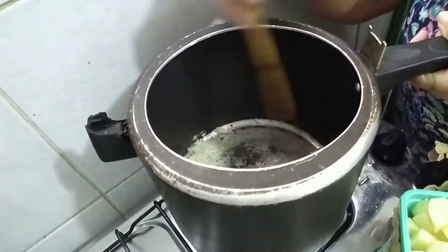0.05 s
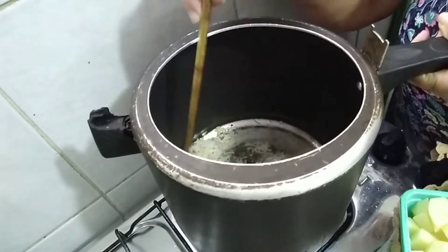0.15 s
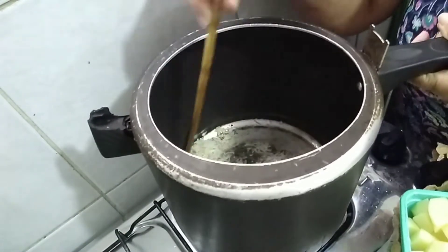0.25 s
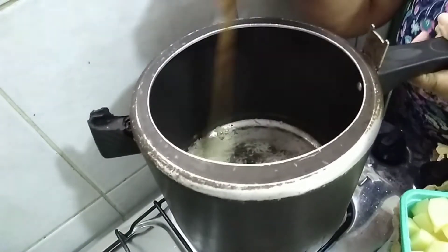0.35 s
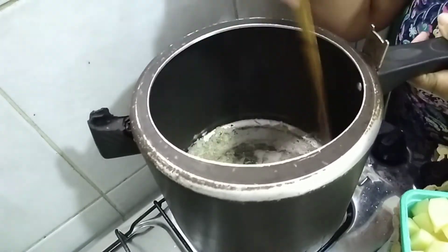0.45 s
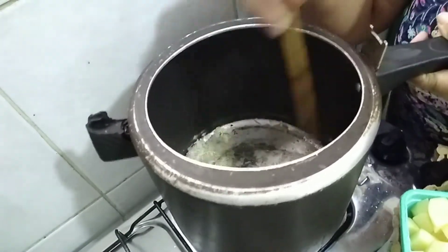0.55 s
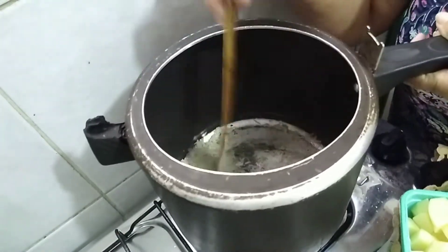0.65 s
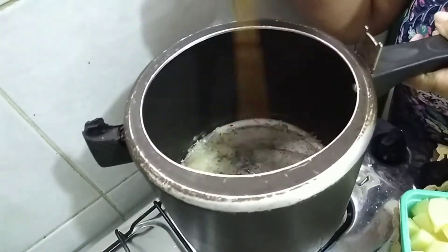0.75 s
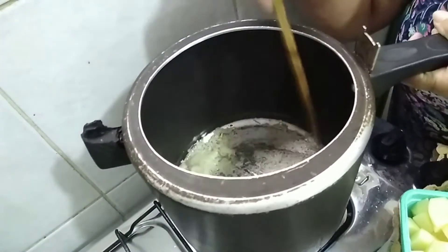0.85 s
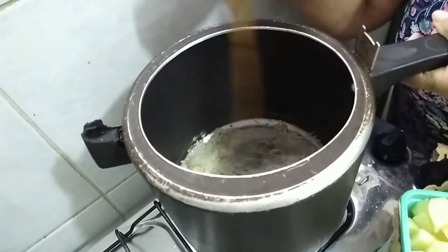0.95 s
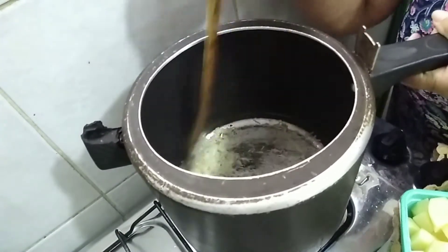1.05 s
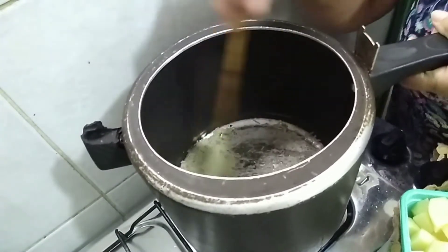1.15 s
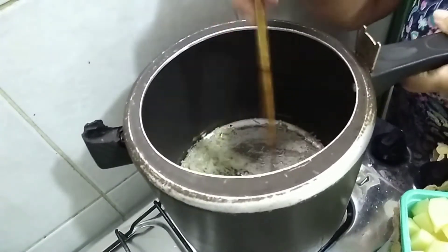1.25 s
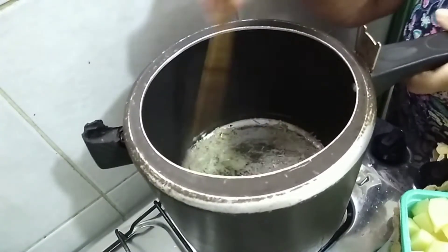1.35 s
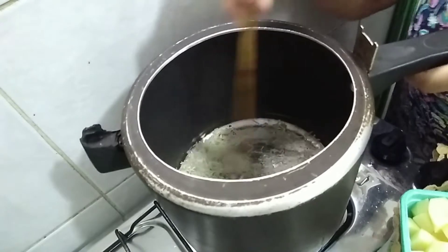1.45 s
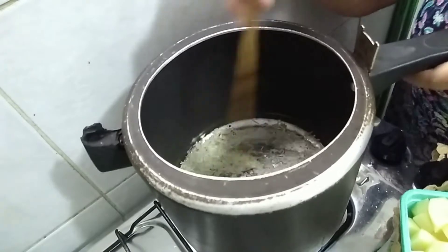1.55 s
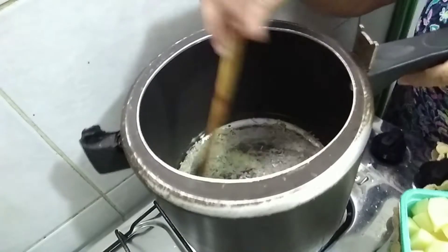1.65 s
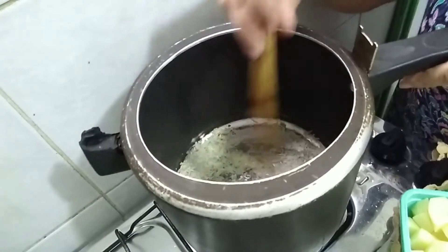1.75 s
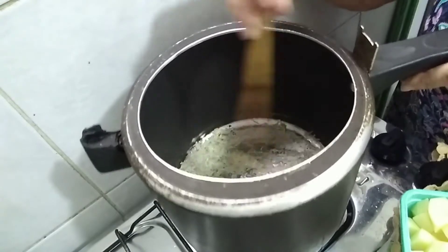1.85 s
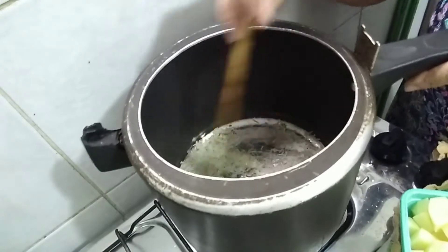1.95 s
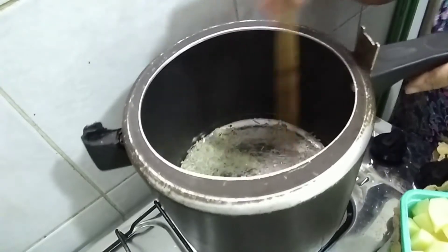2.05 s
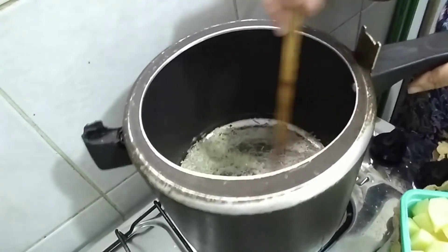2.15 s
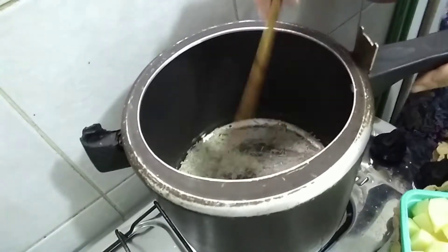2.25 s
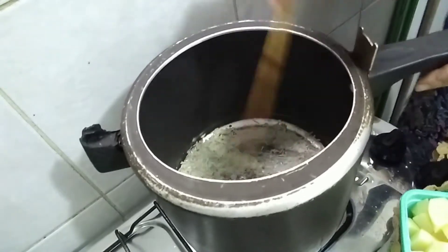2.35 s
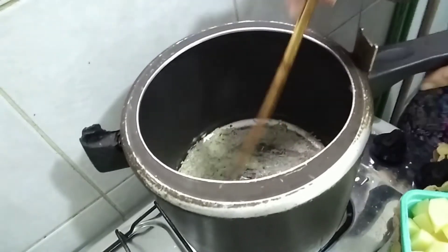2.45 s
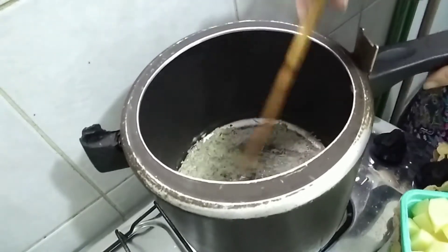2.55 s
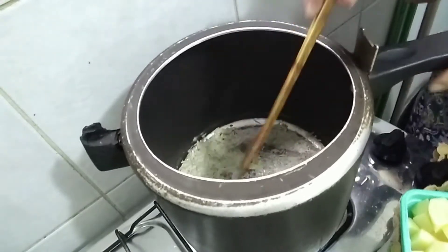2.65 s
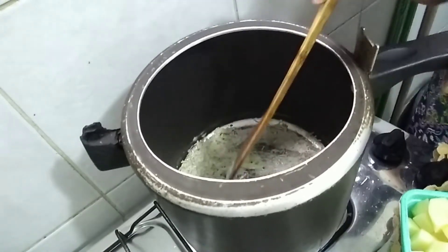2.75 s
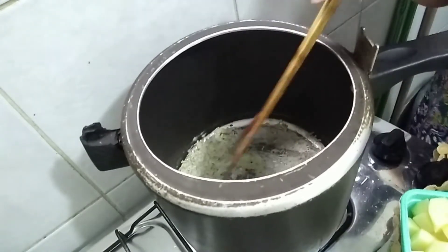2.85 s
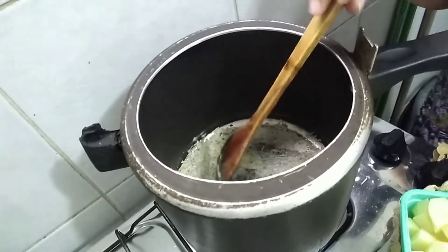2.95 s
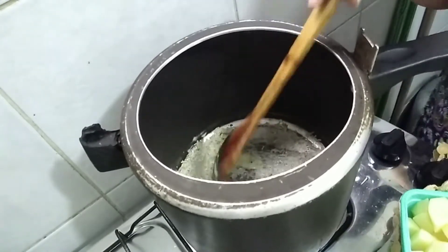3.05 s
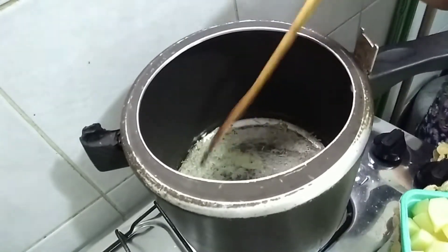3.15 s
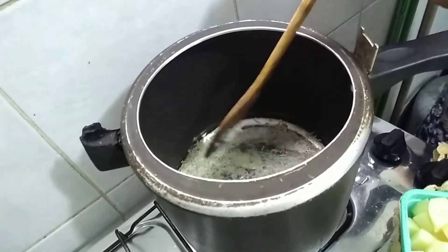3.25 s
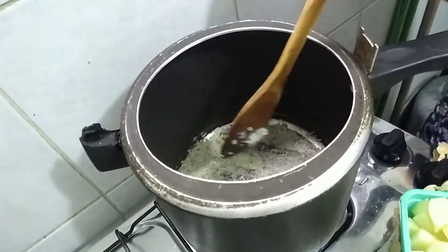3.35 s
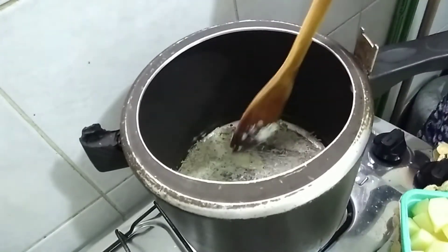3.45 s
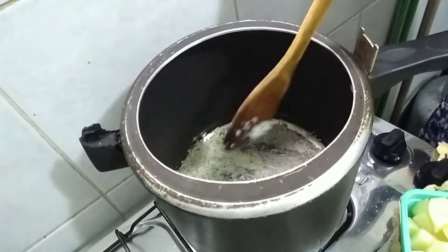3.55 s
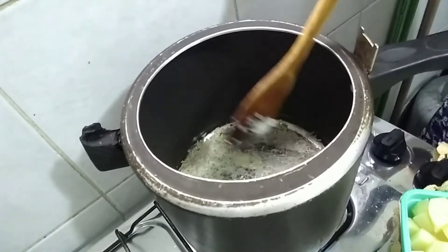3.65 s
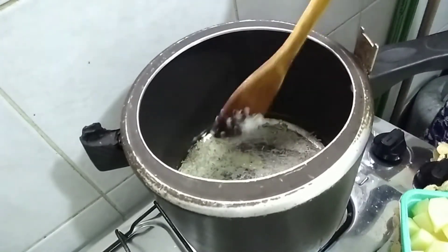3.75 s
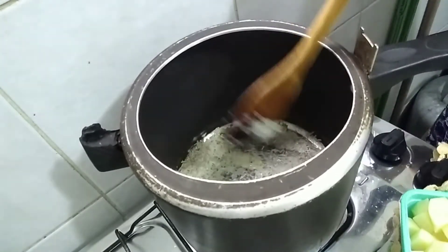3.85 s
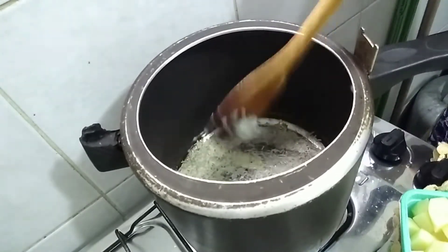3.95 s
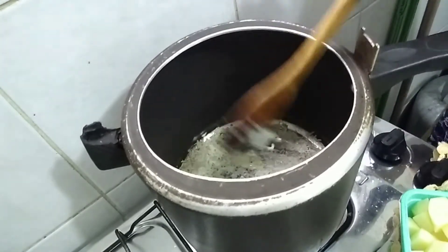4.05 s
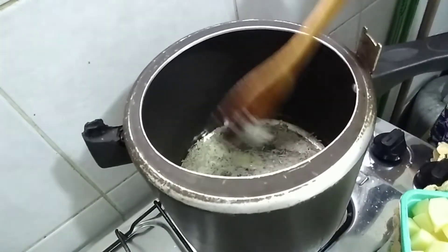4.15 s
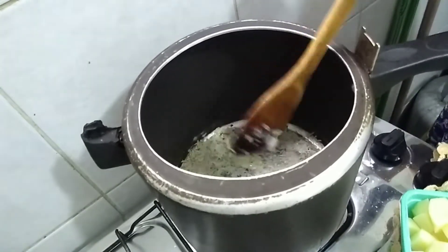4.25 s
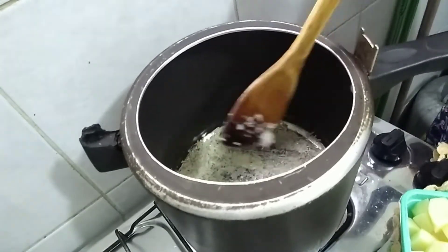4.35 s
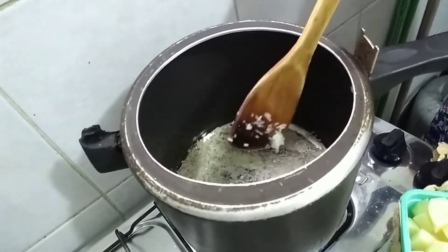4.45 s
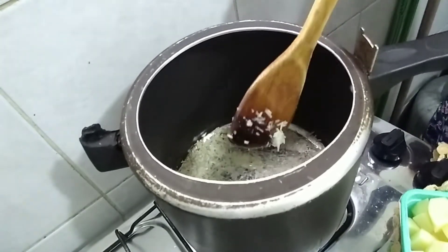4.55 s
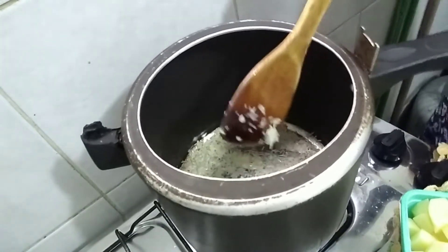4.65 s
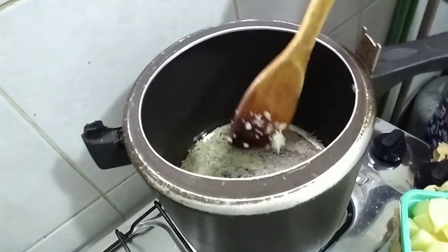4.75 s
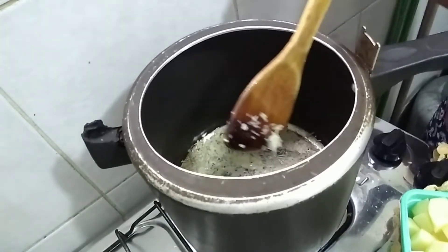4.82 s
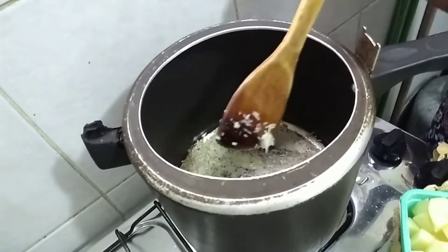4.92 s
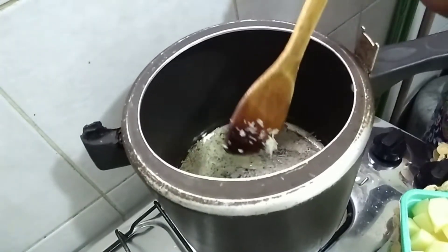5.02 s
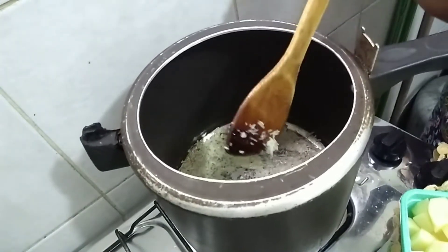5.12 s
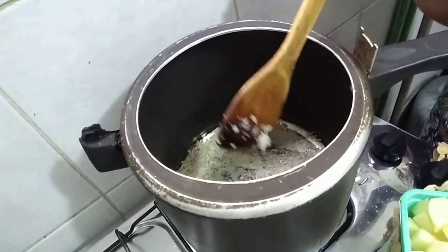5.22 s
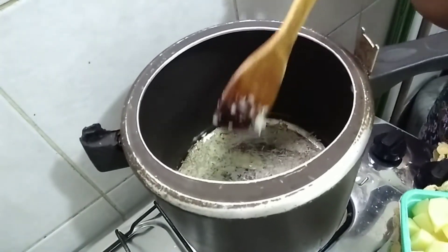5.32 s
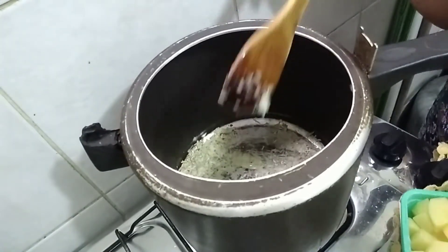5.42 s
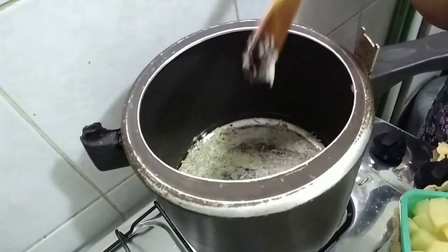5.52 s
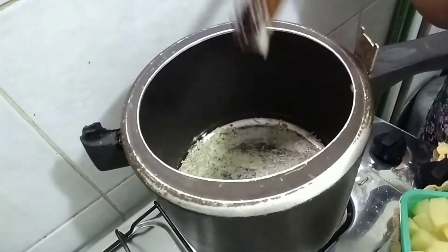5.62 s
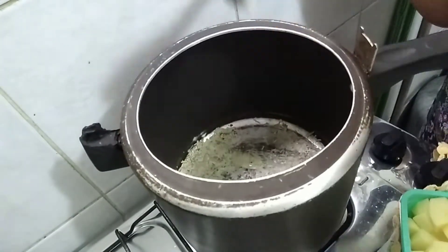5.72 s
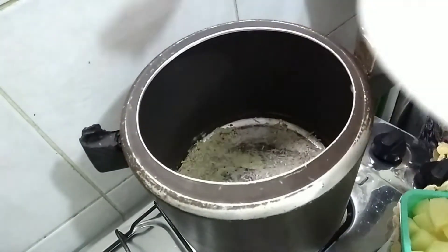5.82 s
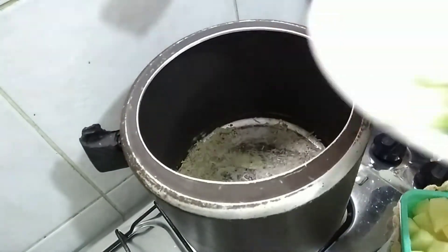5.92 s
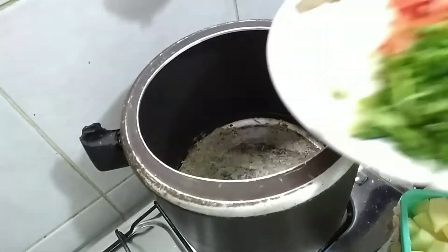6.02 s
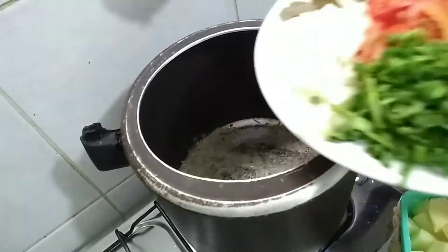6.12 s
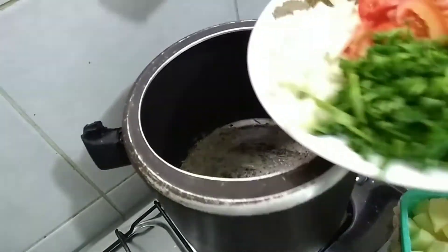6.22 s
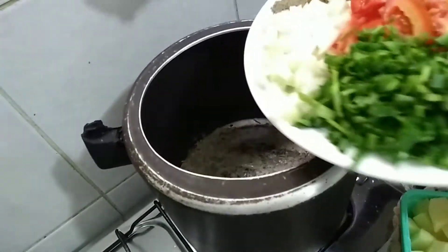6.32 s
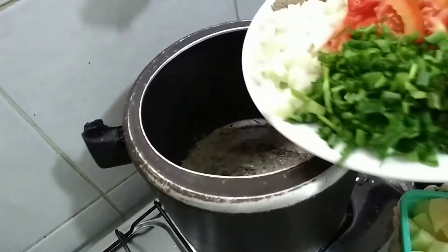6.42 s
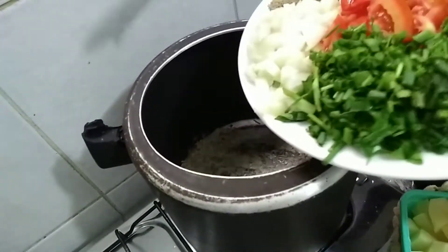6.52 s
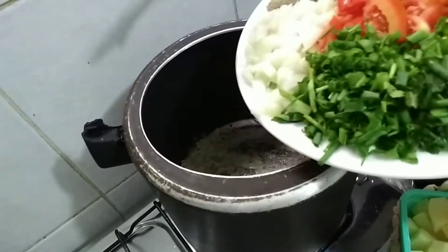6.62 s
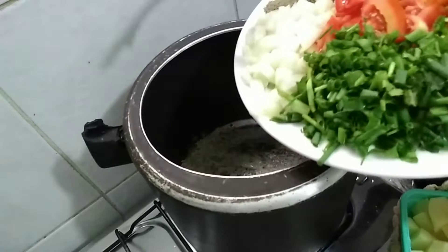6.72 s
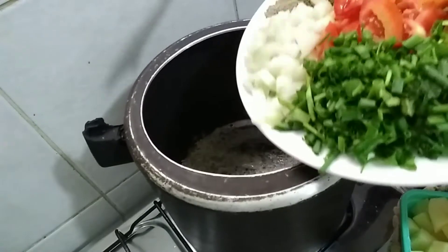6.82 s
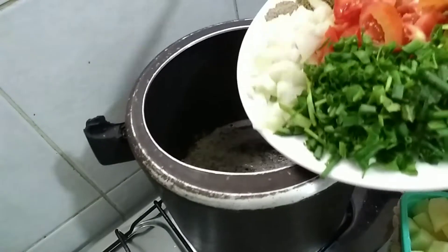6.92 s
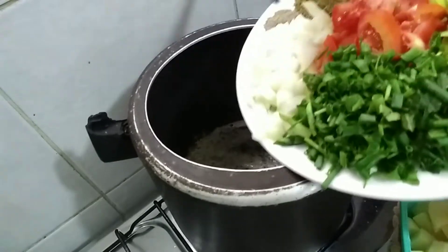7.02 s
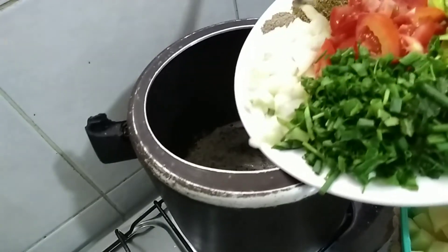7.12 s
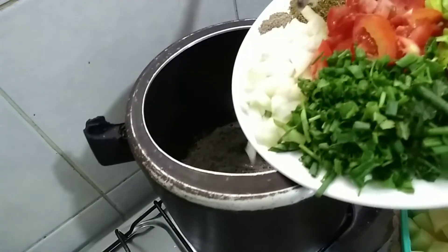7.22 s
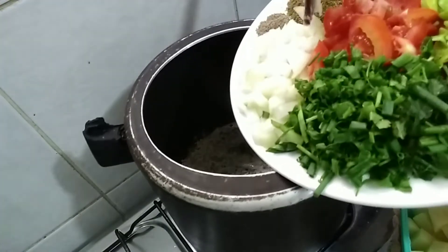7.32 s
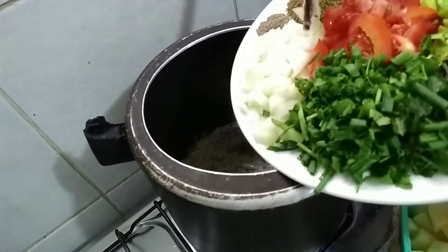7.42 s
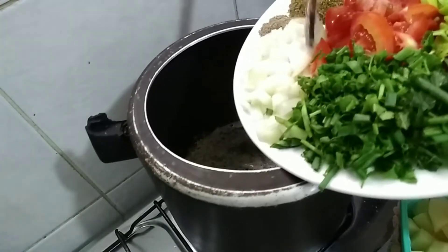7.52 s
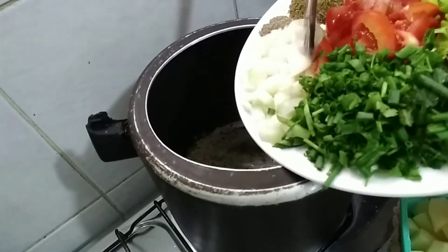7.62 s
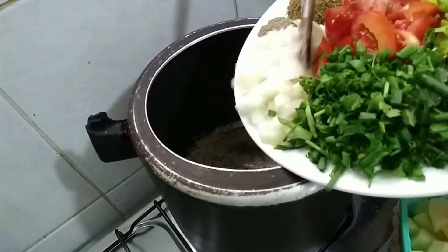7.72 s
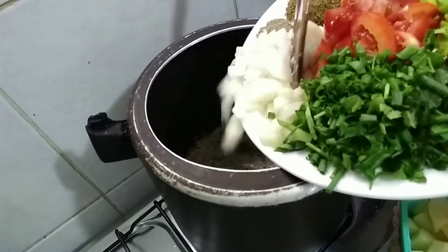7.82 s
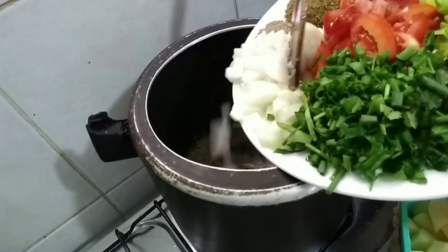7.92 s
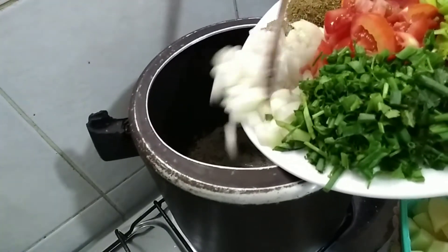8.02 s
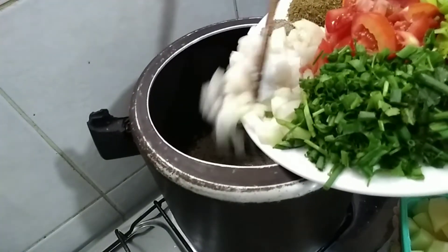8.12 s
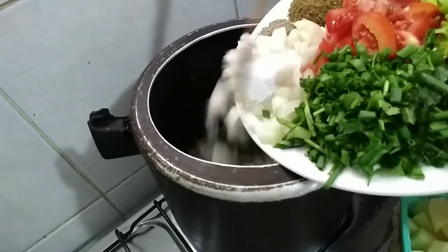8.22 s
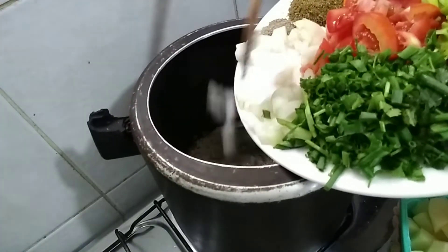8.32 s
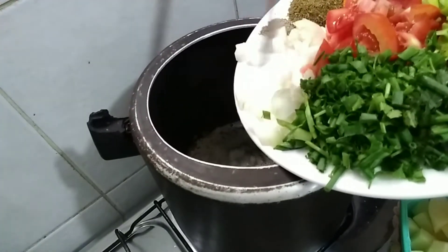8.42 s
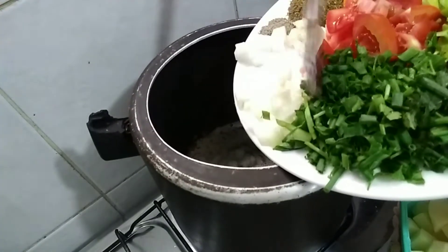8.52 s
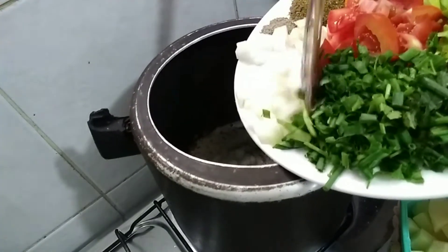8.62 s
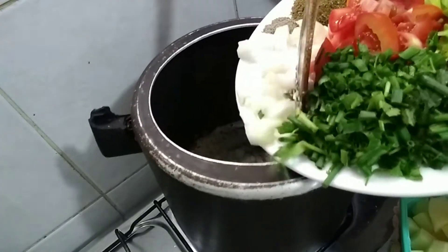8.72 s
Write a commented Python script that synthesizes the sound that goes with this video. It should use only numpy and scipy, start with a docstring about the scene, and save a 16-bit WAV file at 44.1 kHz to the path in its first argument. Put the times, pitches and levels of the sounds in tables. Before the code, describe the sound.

Bright frying hiss slowly fades under hollow spoon knocks, then flares as chopped onion lands with soft thuds; a gas flame and motors hum below.

```python
"""Garlic sizzles in a film of oil in a deep metal pot: a dense random patter of bubbles, shaped as coloured noise.
Chopped onion falls in with soft thuds and the frying flares up. A wooden spoon stirs and knocks, a plate bumps
the rim and shades the hiss, and the pot rocks on its grate: short clicks excite resonances, and struck parts ring.
Behind them are a gas flame (noise) and humming motors (sine tones) in a small tiled kitchen.
Two close microphones with stereo widening pick it up; the levels below are set ahead of balance and widening."""
import sys
import numpy as np
from scipy import signal
from scipy.fft import rfft, irfft, next_fast_len
from scipy.io import wavfile

SR = 44100
rng = np.random.default_rng(int(sys.argv[2]) if len(sys.argv) > 2 else 0)


def transcribe(signal):
    """Save signal, clipped to [-1, 1], as a 16-bit WAV file at the path in sys.argv[1]."""
    frames = np.atleast_2d(signal).T
    limited = np.clip(frames, -1, 1)
    pcm = np.round(limited * 32767).astype(np.int16)
    wavfile.write(sys.argv[1], SR, pcm)


N = 386757

# spectrum of the frying: (f/Hz, level/dB per Hz)
SIZZLE_SPECTRUM = [(300, -40), (800, -12), (1500, -49), (2400, 3.5), (3000, -1), (3650, 0.5), (4300, 1.5),
                   (5300, 1.25), (6400, 1.5), (7500, 2), (8600, 2), (10500, 3), (12500, 3), (14300, -4)]
# resonances of the pot's air under steady excitation: (f/Hz, width/Hz, level/dB)
POT_AIR = [(1168, 38, -1), (1323, 170, -6.5), (1710, 160, -3), (2387, 206, -9), (2735, 120, -7.5),
           (3100, 1000, -14.5), (5460, 320, -14)]
# low resonances of the pot on its grate: (f/Hz, width/Hz, level/dB)
GRATE_THUD = [(123, 134, -8), (189, 29, 1.5), (250, 29, -4), (323, 49, 0)]
# chopped onion landing in the oil: (t/s, thud level/dB, ring level of the pot's air/dB)
ONION_LANDINGS = [(7.192, -67, -52), (7.964, -54, -42.5), (7.983, -41, -43.5), (8.114, -60, -51),
                  (8.164, -46, -36), (8.223, -49, -43), (8.236, -54, -44.5), (8.261, -51, -44),
                  (8.31, -50, -42.5), (8.319, -54, -37.5), (8.397, -62, -51), (8.453, -65, -54)]
# the steady sounds dip briefly: (start t/s, end t/s, hiss level/dB, bass level/dB)
DIPS = [(1.2, 1.544, -2.5, -4.5), (6.128, 6.307, -4.5, -2.5), (7.627, 7.966, -3.5, -3.5)]
DIP_EDGE_S = 0.04
FRYING_DB = -38.5   # frying level at the start
BLOW = SR // 2   # samples that a blow lasts
GRATE_LAG_S = 0.00453   # the grate answers after the contact
PLATE_LAG_S = 0.00011   # the plate is heard this much later on the right than on the left


def sizzle(split_hz=7000, top_split_hz=10800):
    """Larger bubbles crackle, tiny ones fizz above, with fine spray on top; a hollow note sounds in the pot's air."""
    large = bursts(per_s=1800, spread_db=3.1, wash_db=3)
    tiny = bursts(per_s=1600, spread_db=3.5, wash_db=5.5)
    finest = bursts(per_s=1800, spread_db=3.4, wash_db=6)
    crackle = signal.lfilter(*signal.butter(2, split_hz, "low", fs=SR), large)
    fizz = signal.lfilter(*signal.butter(2, split_hz, "high", fs=SR), tiny)
    fizz = signal.sosfilt(signal.butter(4, top_split_hz, "low", fs=SR, output="sos"), fizz)
    spray = signal.sosfilt(signal.butter(4, top_split_hz, "high", fs=SR, output="sos"), finest)
    # the spray flickers separately from the rest
    hiss = colour((crackle + fizz) * flicker() + spray * flicker(), SIZZLE_SPECTRUM)

    bubbling = bursts(per_s=830, spread_db=-1.0, wash_db=0.5)
    hollow = rms_one(resonate(bubbling, POT_AIR)) * from_db(2.64 * drift(16))
    vigour = frying_gain()
    # the hollow note follows only part of the frying's swing in dB
    hollow_start_db, hollow_follows = -51, 0.35
    hollow_gain = from_db(hollow_start_db) * (vigour / from_db(FRYING_DB)) ** hollow_follows
    return vigour * hiss + hollow_gain * hollow


def frying_gain():
    """The hiss fades as garlic dries, flares under spoon strokes, is shaded by the plate and fed by the onion."""
    # strokes turn wet garlic onto hot metal: (start t/s, end t/s, flare level/dB)
    strokes = [(0.05, 1.1, 3), (0.51, 0.738, 2.5), (1.595, 1.834, 5), (2.08, 3.437, 1.5), (3.702, 4.01, 1),
               (4.35, 4.834, 1.6)]
    drying_db_per_s = 1.0
    attack_s, release_s = 0.19, 0.053
    plate_over_s, plate_move_s, plate_shade_db = 5.6, 0.11, -1.5
    onion_fry_db, onion_rise_s, onion_settle_s = -5.5, 0.0082, 0.61

    t = np.arange(N) / SR
    flares = sum(db * held(start, end, attack_s, release_s) for start, end, db in strokes)
    shade = plate_shade_db * np.clip((t - plate_over_s) / plate_move_s, 0, 1)
    power = from_db(FRYING_DB - drying_db_per_s * t + flares + shade) ** 2
    # a clump with a louder thud is bigger and fries up more, then settles
    for s, size_db, _ in ONION_LANDINGS:
        age = np.maximum(t - s, 0)
        swell = (1 - np.exp(-age / onion_rise_s)) * np.exp(-age / onion_settle_s)
        power = power + from_db(size_db + onion_fry_db) ** 2 * swell
    dips = sum(db * held(start, end, DIP_EDGE_S, DIP_EDGE_S) for start, end, db, _ in DIPS)
    return np.sqrt(power) * from_db(dips)


def flicker():
    """Gain that flickers as patches of wet garlic flare up and die down."""
    return from_db(.6 * drift(14) + .55 * drift(40))


def bursts(per_s, spread_db, wash_db):
    """Noise swells at random moments by random amounts and dies away at once, over a steady wash of noise."""
    decay_s = 0.0031
    happens = rng.random(N) < per_s / SR
    sizes = from_db(spread_db * np.minimum(rng.exponential(1, N), 7)) * happens
    splash_power = signal.lfilter([1], [1, -np.exp(-1 / (decay_s * SR))], sizes ** 2)
    power = splash_power / splash_power.mean() + from_db(wash_db) ** 2
    return rms_one(np.sqrt(power) * diffuse(N))


def crackles():
    """Bigger bubbles pop clear of the hiss: very short noise bursts at random moments and of random size."""
    pops_per_s, decay_s, spread_db = 140, 0.0007, 2.5
    below_hiss_db = -14
    happens = rng.random(N) < pops_per_s / SR
    pops = from_db(spread_db * np.minimum(rng.exponential(1, N), 3)) * happens
    splash = signal.lfilter([1], [1, -np.exp(-1 / (decay_s * SR))], pops)
    return frying_gain() * from_db(below_hiss_db) * colour(splash * diffuse(N), SIZZLE_SPECTRUM)


def spits():
    """Single drops of water burst out of the oil, each a pitched click."""
    # lone spits: (t/s, level/dB, f/Hz)
    drops = [(3.49, -52, 7500), (7.548, -52.5, 5200), (7.635, -54, 9000)]
    out = np.zeros((2, N))
    for s, db, hz in drops:
        add(out, s, click(db, hz))
    return out


def onion():
    """Soft clumps land with a dull thud and a hollow note each, with loose bits trickling between them."""
    # loose bits: (start t/s, end t/s, level/dB)
    trickle = (8.16, 8.37, -52)
    # the pot's air under the plate: (f/Hz, width/Hz, level/dB)
    plop = [(1190, 75, 4), (1300, 130, -3), (1660, 60, -2)]
    # the pot floor under a soft clump: (f/Hz, width/Hz, level/dB)
    soft_landing = [(190, 96, 0), (310, 57, 9), (570, 280, -6)]

    start, end, db = trickle
    edge_s = 0.021
    loose_bits = rms_one(resonate(bursts(per_s=96, spread_db=1.5, wash_db=-9), plop))
    out = from_db(db) * held(start, end, edge_s, edge_s) * loose_bits
    for s, thud_db, ring_db in ONION_LANDINGS:
        patter = contact(echo_db=2.0, echo_t60=0.12, room_db=3.0, room_t60=0.45)
        thud = at_level(resonate(patter, soft_landing), thud_db)
        hollow = at_level(resonate(clump(), plop), ring_db)
        add(out, s, thud + hollow)
    return out


def clump(count=4):
    """Several pieces land one just after another, each weaker than the last."""
    gap_s, loss_db = 0.003, 1.5   # from piece to piece; each gap also varies at random
    out = np.zeros((2, BLOW))
    for k, late in enumerate(rng.random(count)):
        start = round(gap_s * (k + late / 2) * SR) if k else 0
        piece = contact(echo_db=-7, echo_t60=.05, room_db=-10, room_t60=.3)
        out[:, start:] += from_db(-loss_db * k) * piece[:, :BLOW - start]
    return out


def wall_strikes():
    """The spoon strikes the pot wall: a blow, then the wall rings in its own modes."""
    # (t/s, level/dB, hardness/dB, ring level/dB, ring tilt/dB per octave)
    strikes = [(0.381, -42.5, -6.5, -42, -1.5), (0.405, -44.5, 1, -38, 0), (0.4215, -37.5, 5.5, -31, 1),
               (0.943, -40.5, -3, -42.5, -8), (0.970, -57, -7, -41, -9)]
    # modes of the wall: (f/Hz, level/dB, t60/s)
    wall_modes = [(667, 1, 0.22), (1174, 1, 0.14), (1697, 2, 0.15), (2890, -8, 0.12), (3110, 0, 0.2),
                  (3358, -3, 0.2), (3484, -11, 0.1), (3613, -1, 0.13), (4712, -8, 0.07), (5125, -3, 0.14)]
    # share of the force: (thud/dB, base/dB, hollow/dB, crack/dB, push/dB, tick/dB)
    shares = (-10.5, -18, -2, -3.5, -2.5, -6)
    out = np.zeros((2, N))
    for s, db, hardness_db, ring_db, tilt_db in strikes:
        out += blow(s, db, hardness_db, shares, push_hz=940)
        out += ringing(s, ring_db, wall_modes, tilt_db)
    return aside(out, lag_s=-0.00025)


def floor_taps():
    """The spoon taps the pot floor and the air across the pot sings on; a flat landing favours floor over air."""
    # (t/s, level/dB, hardness/dB, flatness/dB, contact pitch f/Hz)
    taps = [(2.373, -34, -1, 2, 1150), (2.570, -36, -2.5, -9.5, 1190), (2.641, -45, -4.5, 7.5, 600),
            (4.003, -30.5, -0.5, 4, 1070), (4.532, -29, 2.5, 12.5, 560), (4.634, -52, 2, 11, 950),
            (8.657, -44.5, -3.5, 10, 600)]
    # modes of the air across the pot: (f/Hz, level/dB, t60/s)
    air_modes = [(1040, -24, 0.091), (1176, 0, 0.081), (1340, -15, 0.06), (1598, -11, 0.06),
                 (1610, -9, 0.1)]
    # share of the force: (thud/dB, base/dB, hollow/dB, crack/dB, push/dB, tick/dB)
    shares = (-4, -9, -1.5, -15.5, -5.5, -21)
    air_ring_db = 4.5   # relative to the tap less its flatness
    out = np.zeros((2, N))
    for s, db, hardness_db, flat_db, push_hz in taps:
        out += blow(s, db, hardness_db, shares, push_hz, flat_db)
        out += ringing(s, db - flat_db + air_ring_db, air_modes)
    return aside(out, lag_s=-0.000043)


def plate_bumps():
    """The plate bumps the rim: a blow, a crisp snap, a dry clack and the ring of the rim."""
    # (t/s, level/dB, hardness/dB, ring level/dB, snap level/dB, clack level/dB)
    bumps = [(6.1082, -29.5, -0.5, -34, -46, -28), (6.3435, -39.5, -2, -38, -66, -46),
             (7.027, -40.5, -6, -50, -43, -56)]
    # modes of the rim with the plate against it: (f/Hz, level/dB, t60/s)
    rim_modes = [(1165, -10.5, 0.2), (1570, 0, 0.08), (1698, 2, 0.21), (2400, 8, 0.1), (2560, 0, 0.11),
                 (2730, -2, 0.2), (2800, -3, 0.15), (2918, -6, 0.12), (3300, -4, 0.17), (3965, -9, 0.2)]
    # share of the force: (thud/dB, base/dB, hollow/dB, crack/dB, push/dB, tick/dB)
    shares = (-5.5, -0.5, -25, 0.5, -4, -3)
    out = np.zeros((2, N))
    for s, db, hardness_db, ring_db, snap_db, clack_db in bumps:
        out += blow(s, db, hardness_db, shares, push_hz=495)
        out += ringing(s, ring_db, rim_modes)
        add(out, s, snap(snap_db) + clack(clack_db))
    return aside(out, PLATE_LAG_S)


def snap(db, hz=7400):
    """The crisp top of a glazed china contact, half an octave wide and scattered by the pot."""
    band = signal.butter(2, [hz / 2 ** .25, hz * 2 ** .25], "band", fs=SR, output="sos")
    splash = contact(echo_db=4, echo_t60=.12, room_db=-8, room_t60=.2)
    return at_level(signal.sosfilt(band, splash), db)


def clack(db):
    """China edge on metal rim, close to the microphones: a few dry cycles that swell and stop."""
    touch = contact(echo_db=-11, echo_t60=.1, room_db=-18, room_t60=.2)
    band = [(2600, 1000, 0)]   # (f/Hz, width/Hz, level/dB)
    return at_level(resonate(resonate(touch, band), band), db)


def clinks():
    """A metal utensil touches the plate: a small pitched tap and the ring of the china."""
    # (t/s, click level/dB, click pitch f/Hz, ring level/dB)
    touches = [(7.001, -43, 2530, -62), (7.0284, -43, 3480, -35), (7.0331, -45, 2650, -47),
               (7.194, -44.5, 1470, -49), (7.99, -45, 1650, -55)]
    # modes of the plate: (f/Hz, level/dB, t60/s)
    plate_modes = [(1684, -3, 0.22), (2660, -1, 0.2), (3000, -4, 0.2), (3530, 0, 0.13), (3950, 4, 0.14),
                   (4500, -6, 0.1), (5490, 1, 0.17), (7150, -4, 0.072)]
    width_hz = 370
    out = np.zeros((2, N))
    for s, db, hz, ring_db in touches:
        touch = contact(echo_db=-5, echo_t60=.06, room_db=-10, room_t60=.25)
        add(out, s, at_level(resonate(touch, [(hz, width_hz, 0)]), db))
        out += ringing(s, ring_db, plate_modes)
    return aside(out, PLATE_LAG_S)


def rubs():
    """The spoon rubs across the gritty floor: wood sticks and slips and sounds the air in the pot."""
    # (start t/s, end t/s, level/dB)
    rub_times = [(0.05, 0.108, -47), (0.52, 0.665, -46), (1.945, 2.007, -46), (3.862, 3.978, -51.5),
                 (4.377, 4.515, -49)]
    edge_s = 0.021
    strokes = sum(from_db(db) * held(start, end, edge_s, edge_s) for start, end, db in rub_times)
    return strokes * rms_one(resonate(bursts(per_s=180, spread_db=5.0, wash_db=0), POT_AIR))


def skids():
    """The spoon's edge chatters briefly along the metal."""
    # (start t/s, end t/s, level/dB)
    skid_times = [(0.38, 0.429, -36), (0.85, 0.88, -46), (3.998, 4.037, -38.5)]
    # what a skid excites: (f/Hz, width/Hz, level/dB)
    rasp = [(810, 120, -1), (1690, 90, 11.5), (3200, 300, -3), (3620, 110, 2.5), (5460, 400, -2)]
    edge_s = 0.006
    strokes = sum(from_db(db) * held(start, end, edge_s, edge_s) for start, end, db in skid_times)
    return strokes * rms_one(resonate(bursts(per_s=400, spread_db=2, wash_db=-6), rasp))


def rocks():
    """The pot rocks on its grate: a blow, then a low boom a moment later."""
    # (t/s, level/dB, hardness/dB, boom level/dB, boom pitch f/Hz)
    rock_hits = [(0.867, -43.5, -3, -39, 213), (0.914, -47, -2, -44, 159), (0.945, -40.5, -1, -39, 182),
                 (1.351, -42, 0.5, -34, 191), (1.87, -57.5, -9, -46, 203), (2.168, -40.5, 0.5, -38, 185),
                 (2.449, -40.5, -3.5, -36, 215), (2.463, -49, -3, -37, 181), (2.5, -51, -3, -43, 178),
                 (4.533, -49, -5, -24, 194), (4.813, -45, 2, -56, 200), (4.86, -46, -2, -39, 187),
                 (6.378, -43.5, -1.5, -50, 205), (6.414, -44, -4.5, -50, 195), (6.46, -52, -5, -39, 194),
                 (7.035, -52, -7.5, -37, 196), (7.056, -51, -6, -42, 185)]
    # share of the force: (thud/dB, base/dB, hollow/dB, crack/dB, push/dB, tick/dB)
    shares = (-2, -9, -7.5, -12, -14, -28)
    boom_t60_s = 0.25
    out = np.zeros((2, N))
    for s, db, hardness_db, boom_db, boom_hz in rock_hits:
        out += blow(s, db, hardness_db, shares, push_hz=690)
        out += ringing(s + GRATE_LAG_S, boom_db, [(boom_hz, 0, boom_t60_s)])
    return aside(out, lag_s=-0.0003)


def drags():
    """Pushed by spoon or plate, the pot judders along its grate with a low rumble."""
    # (start t/s, end t/s, level/dB)
    drag_times = [(0.865, 0.97, -45), (2.38, 2.66, -51), (4.57, 4.924, -53), (6.37, 6.47, -47)]
    edge_s = 0.016
    pushes = sum(from_db(db) * held(start, end, edge_s, edge_s) for start, end, db in drag_times)
    rumble = resonate(bursts(per_s=81, spread_db=2.5, wash_db=-1), GRATE_THUD)
    # the pot is too small to sound the deep bass
    no_deep_bass = signal.butter(2, 110, "high", fs=SR, output="sos")
    return pushes * rms_one(signal.sosfilt(no_deep_bass, rumble))


def blow(s, db, hardness_db, shares, push_hz, flat_db=0):
    """A blow shares its force between grate, pot floor, enclosed air and contact point; hard ones are brighter."""
    # what a knock excites, each (f/Hz, width/Hz, level/dB): pot floor and spoon, air across the pot, hard contact
    base_modes = [(375, 47, 2), (465, 59, 4), (544, 150, 2), (678, 214, 2), (856, 550, -5.5)]
    hollow_modes = [(865, 310, -1.5), (1193, 72, 13.5), (1300, 70, -2), (1600, 72, 7.5)]
    crack_modes = [(1650, 590, 9.4), (2640, 860, 14.2), (3400, 560, 14), (3505, 100, 21), (5330, 3000, 2.8)]
    tick_hz = 2780   # the sharp part of the direct click; push_hz is its dull part

    # in the order thud, base, hollow, crack, push, tick
    hardness_tilt = hardness_db * np.array([-1.5, -.5, .5, 1.5, 0, 1.5])
    flatness_tilt = flat_db * np.array([0, 1, -1, 0, 0, 0])
    part_db = db + np.array(shares) + (hardness_tilt + flatness_tilt)
    thud_db, base_db, hollow_db, crack_db, push_db, tick_db = part_db

    thud = resonate(contact(echo_db=-1, echo_t60=.15, room_db=-4, room_t60=.5), GRATE_THUD)
    base = resonate(contact(echo_db=3.5, echo_t60=.15, room_db=-3, room_t60=.27), base_modes)
    hollow = resonate(contact(echo_db=0, echo_t60=.09, room_db=-7, room_t60=.27), hollow_modes)
    crack = resonate(contact(echo_db=8, echo_t60=.18, room_db=-3, room_t60=.24), crack_modes)
    out = np.zeros((2, N))
    add(out, s + GRATE_LAG_S, at_level(thud, thud_db))
    add(out, s, at_level(base, base_db) + at_level(hollow, hollow_db) + at_level(crack, crack_db))
    add(out, s, click(push_db, push_hz) + click(tick_db, tick_hz))
    return out


def ringing(s, hit_db, modes, tilt_db=0):
    """A struck body rings on in fading sine tones; tilt is in dB per octave above the first mode."""
    rise_s = 0.0004   # the ring builds up while the contact lasts
    out, t = np.zeros((2, N)), np.arange(BLOW) / SR
    rise = 1 - np.exp(-t / rise_s)
    for hz, db, t60 in modes:
        # a phase of its own at each microphone, wider apart in the treble
        phase = rng.normal(0, 1, (2, 1)) * min(hz / 5000, 1)
        gain = from_db(hit_db + db + tilt_db * np.log2(hz / modes[0][0]))
        add(out, s, gain * rise * decay(t60) * np.sin(2 * np.pi * hz * t + phase))
    return out


def click(db, hz):
    """A click an octave wide that comes straight to the microphones, with only a short splash of echoes."""
    band = signal.butter(2, [hz / np.sqrt(2), hz * np.sqrt(2)], "band", fs=SR, output="sos")
    splash = contact(echo_db=-7, echo_t60=.11, room_db=-14, room_t60=.2)
    return at_level(signal.sosfilt(band, splash), db)


def contact(echo_db, echo_t60, room_db, room_t60):
    """One click at each microphone, at most 5 samples apart, with dense pot echoes and the kitchen's tail."""
    pot_echoes = from_db(echo_db) * rms_one(decay(echo_t60))
    room_tail = from_db(room_db) * rms_one(decay(room_t60))
    sound = diffuse(BLOW) * (pot_echoes + room_tail) / np.sqrt(BLOW)
    sound[[0, 1], rng.integers(0, 6, 2)] += 1
    return sound


def stove():
    """The flame's soft roar, with the air of pot and burner booming in it."""
    # spectrum of the flame: (f/Hz, level/dB per Hz)
    flame = [(15, -19), (40, 8), (80, 3.5), (160, 0), (330, 1.5), (560, -1.5), (850, -3.5), (1500, -10),
             (4000, -17.5)]
    # resonances of the air in pot and burner: (f/Hz, width/Hz, level/dB)
    stove_air = [(106, 23, -1), (193.4, 34.4, 2.5), (325, 54, -2), (466, 17.5, 0.5), (562, 20.5, -6),
                 (654, 28, -3.5)]
    roar_db, boom_db = -53.5, -53   # before the bass gain
    roar = from_db(roar_db) * colour(diffuse(N), flame)
    boom = from_db(boom_db) * rms_one(resonate(diffuse(N), stove_air)) * from_db(1.5 * drift(13))
    return bass_gain() * (roar + boom)


def hum():
    """Close motor and mains tones beat against each other, stronger on the left."""
    # tones before bass gain and balance: (f/Hz, rms level/dB)
    hum_tones = [(50.4, -66), (59.2, -58), (118.4, -60), (120, -70)]
    t = np.arange(N) / SR
    tones = 0
    for hz, db in hum_tones:
        peak = from_db(db) * np.sqrt(2)
        tones = tones + peak * np.sin(2 * np.pi * (hz * t + rng.random()))
    return bass_gain() * tones * from_db([[1.3], [-1.3]])


def bass_gain():
    """Gain of flame and hum together: a slow curve with brief dips."""
    # (t/s, level/dB)
    bass_curve = [(0, -2.5), (0.6, -0.5), (1.9, -2), (2.9, 1.5), (4.6, 3), (6.0, 2), (8.77, 2)]
    slow_db = np.interp(np.arange(N) / SR, *np.transpose(bass_curve))
    dips = sum(db * held(start, end, DIP_EDGE_S, DIP_EDGE_S) for start, end, _, db in DIPS)
    return from_db(slow_db) * from_db(dips)


def diffuse(size):
    """Noise from all around at the two microphones, with a likeness between them that depends on pitch."""
    # likeness of the two microphones: (f/Hz, likeness/0-1)
    likeness = [(60, 0), (150, 0.5), (300, 0.29), (600, 0.82), (1000, 0.5), (1600, 0.07), (14000, 0)]
    white = rng.standard_normal((2, 2 * next_fast_len(size // 2 + 1)))
    mid, side = rfft(white)
    alike = np.clip(at_hz(likeness, bins(white)), 0, 1)
    left_right = np.sqrt(1 + alike) * mid + np.sqrt(1 - alike) * side * [[1], [-1]]
    return rms_one(irfft(left_right)[:, :size])


def resonate(x, modes):
    """Pass a sound through parallel two-pole resonances of alternating sign."""
    out = 0
    for k, (hz, width, db) in enumerate(modes):
        r = np.exp(-np.pi * width / SR)   # a narrower resonance rings longer
        poles = [1, -2 * r * np.cos(2 * np.pi * hz / SR), r * r]
        gain = (-1) ** k * from_db(db) * (1 - r * r) / 2
        out = out + gain * signal.lfilter([1, 0, -1], poles, x)
    return out


def colour(x, spectrum):
    """Weight a sound with a smooth spectrum, at rms 1."""
    padded = np.pad(x, [(0, 0), (0, next_fast_len(N) - N)])
    weights = from_db(at_hz(spectrum, bins(padded)))
    return rms_one(irfft(rfft(padded) * weights))[:, :N]


def drift(rate):
    """Random curve of rms 1 that heads for a new value rate times a second."""
    steps = np.arange(N) / SR * rate
    return rms_one(np.interp(steps, np.arange(4096), rng.standard_normal(4096)))


def held(start, end, attack, release):
    """Envelope 0-1 that rises from start, holds, and falls from end (all in seconds)."""
    t = np.arange(N) / SR
    return np.clip((t - start) / attack, 0, 1) * np.clip(1 - (t - end) / release, 0, 1)


def decay(t60):
    """Envelope of a blow that falls 60 dB in t60 seconds."""
    return np.exp(-np.log(1000) * np.arange(BLOW) / SR / t60)


def aside(x, lag_s):
    """A source off the centre line reaches the right microphone lag_s after the left (before it if negative)."""
    padded = np.pad(x, [(0, 0), (0, 2 * next_fast_len(N // 2 + BLOW) - N)])
    # half the lag on each side, as a phase turn
    turn = np.exp(1j * np.pi * bins(padded) * lag_s * np.array([[1], [-1]]))
    return irfft(rfft(padded) * turn)[:, :N]


def add(out, s, sound):
    """Mix a blow in at time s in seconds."""
    start = round(s * SR)
    out[:, start:start + BLOW] += sound[:, :N - start]


def at_level(sound, db):
    """Set the rms of a blow's first 30 ms."""
    opening = sound[:, :round(.03 * SR)]
    return from_db(db) * sound / np.sqrt(np.mean(opening ** 2))


def rms_one(x):
    """Scale to rms 1."""
    return x / np.sqrt(np.mean(x ** 2) + 1e-20)


def from_db(db):
    """Turn decibels into gain."""
    return 10 ** (np.asarray(db) / 20)


def at_hz(points, hz):
    """Read a table between its points on a log-frequency axis."""
    known_hz, values = np.transpose(points)
    return np.interp(np.log(hz + 1), np.log(known_hz), values)


def bins(x):
    """Frequencies in Hz of a signal's spectrum."""
    return np.fft.rfftfreq(x.shape[-1], 1 / SR)


def scene():
    """Everything at the two microphones, pot and stove a little to the left."""
    frying = sizzle() + crackles() + spits() + onion()
    spoon = wall_strikes() + floor_taps() + rubs() + skids()
    plate = plate_bumps() + clinks()
    pot_on_grate = rocks() + drags()
    pot = frying + spoon + plate + pot_on_grate
    return (pot + stove()) * from_db([[.9], [-.9]]) + hum()


def record(dry):
    """Widening subtracts a delayed share of the other channel from each; then the top is cut."""
    # share of the other channel: (f/Hz, share/0-1)
    crossfeed = [(400, 0.035), (750, 0.33), (1050, 0.72), (1900, 1), (2300, 1), (3100, 0.64), (3500, 0.64),
                 (3950, 0.93), (4250, 0.75), (4600, 0.42), (5300, 0.45), (6300, 0.33), (8400, 0.1),
                 (14000, 0.12)]
    # delay of that share: (f/Hz, delay/s)
    crossfeed_delay = [(1000, .00049), (2100, .000478), (3150, .000479), (3900, .000498), (4300, .000486),
                       (5000, .000476)]
    cutoff_hz = 14380

    padded = np.pad(dry, [(0, 0), (0, 2 * next_fast_len(N // 2 + BLOW) - N)])
    spectrum, hz = rfft(padded), bins(padded)
    share = np.clip(at_hz(crossfeed, hz), 0, 1)
    delay = np.exp(-2j * np.pi * hz * at_hz(crossfeed_delay, hz))
    other = spectrum[::-1]   # left and right swapped
    wide = (spectrum - share * delay * other) / np.sqrt(1 + share ** 2)
    low_pass = 1 / np.sqrt(1 + (hz / cutoff_hz) ** 400)
    return irfft(wide * low_pass)[:, :N]


dry = scene()
out = record(dry)
transcribe(out)
```